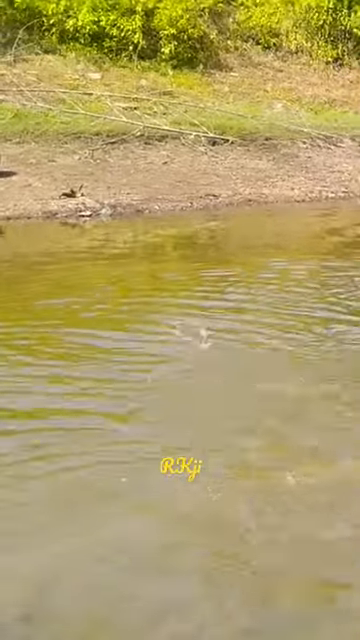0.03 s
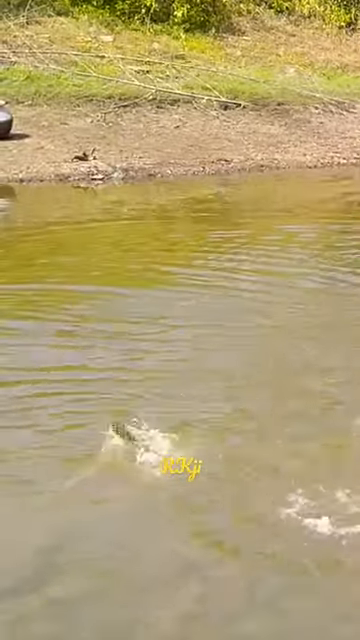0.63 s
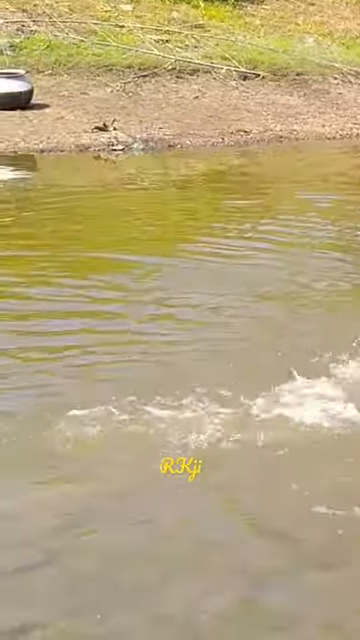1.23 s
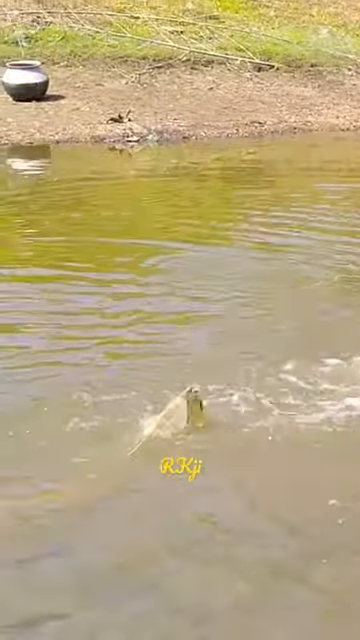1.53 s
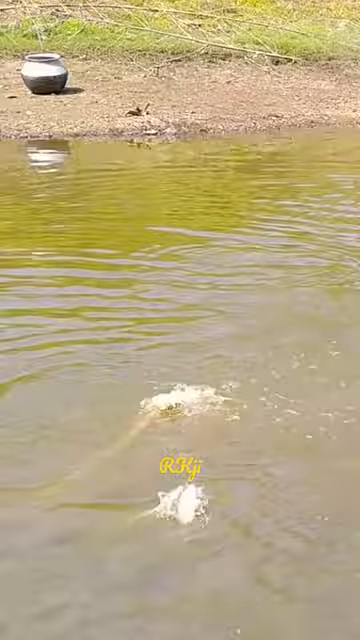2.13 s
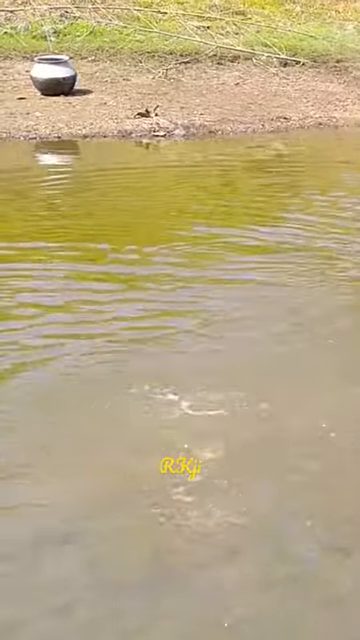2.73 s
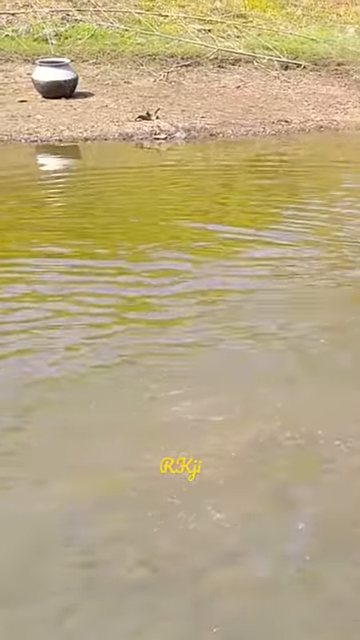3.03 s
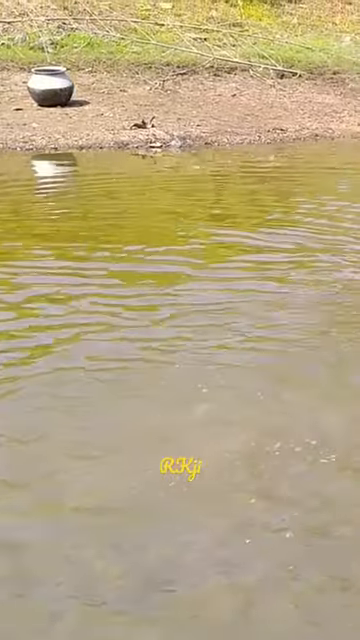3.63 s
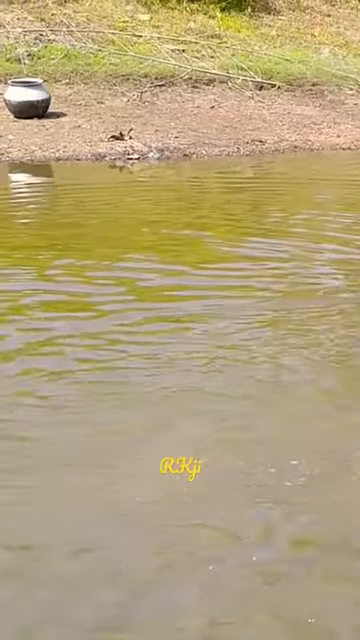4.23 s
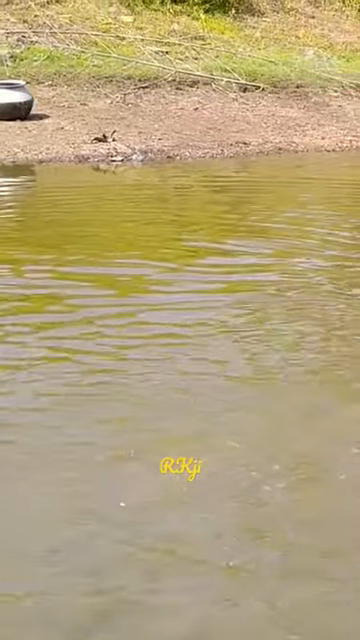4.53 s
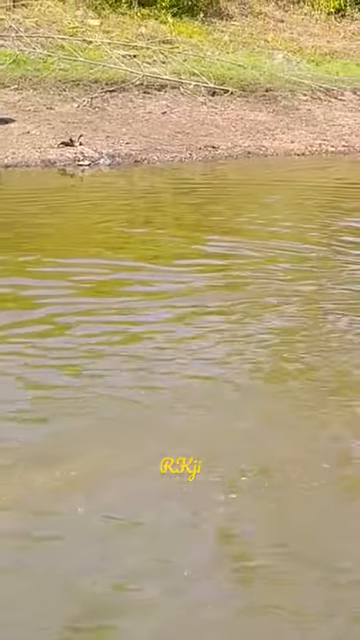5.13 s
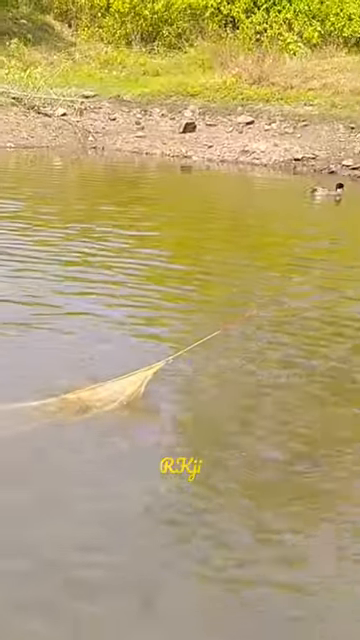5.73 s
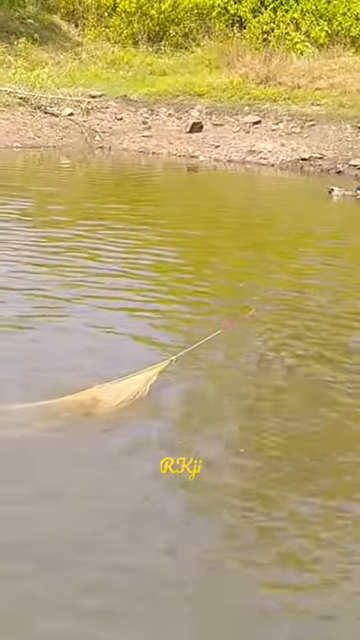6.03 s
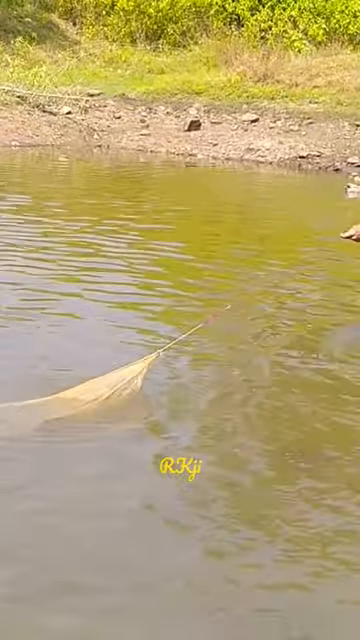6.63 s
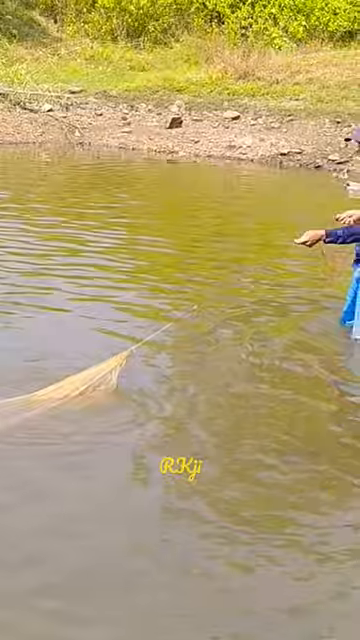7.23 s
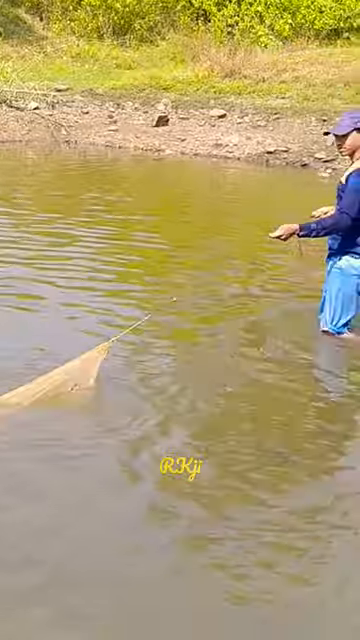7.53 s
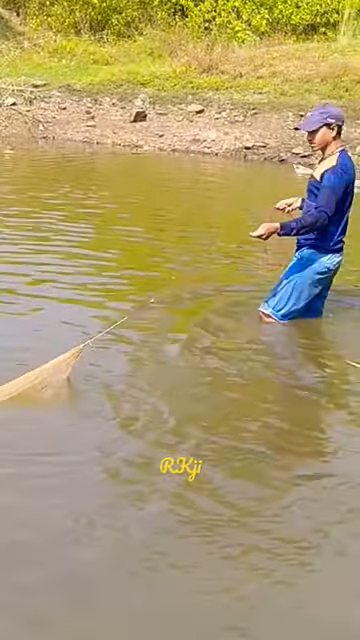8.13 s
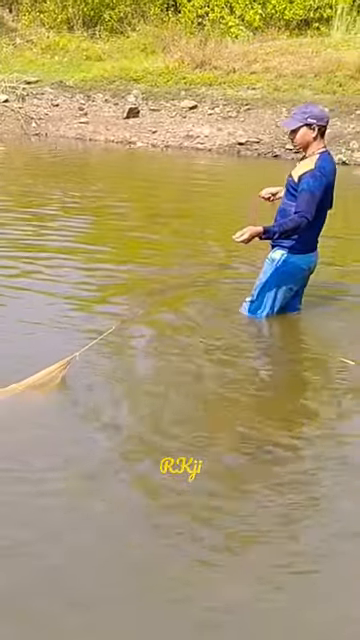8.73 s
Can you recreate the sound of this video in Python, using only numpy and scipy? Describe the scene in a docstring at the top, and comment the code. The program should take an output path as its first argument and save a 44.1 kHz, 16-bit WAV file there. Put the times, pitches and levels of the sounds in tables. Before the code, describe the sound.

Outdoors at a pond, water splashes, gurgles and plops as a net thrashes at the surface. The splashing soon dies away, and uneven low wind buffeting on the microphone takes over. Past the middle, faint trickles and drips fall from the net and the sound cuts out for an instant. Stronger gusts follow, along with brief dry scuffs, a very faint distant whistle and one tap on the microphone.

```python
"""A fishing net is jerked about in a pond: water slaps, air pockets plop, spray and foam crackle.
Each trapped bubble rings as a mass of water on a spring of air. After 2.5 s the pond settles to a few
drips, while gusts shed eddies that buffet the microphone over a faint open-air hiss. From 5 s the net is
hauled in slowly and trickles, and the sound drops out for an instant. Short scuffs follow close by;
near the end come a thin, distant whistle and a tap that rings the microphone housing."""
import sys
import numpy as np
from scipy import signal
from scipy.fft import rfft, irfft, next_fast_len
from scipy.io import wavfile
from scipy.ndimage import uniform_filter1d

SR = 44100
rng = np.random.default_rng(int(sys.argv[2]) if len(sys.argv) > 2 else 0)


def master_out(mix):
    """Clip the mix to full scale and print it as 16-bit PCM to the path in sys.argv[1]."""
    frames = np.transpose(np.atleast_2d(mix))
    ceiling = np.clip(frames, -1, 1)
    pcm = np.round(ceiling * 32767).astype(np.int16)
    wavfile.write(sys.argv[1], SR, pcm)


N = 392049

# Spectrum of bursting droplets: (frequency [Hz], relative spectral density [dB])
SPRAY = [(700, -14.5), (1500, 6), (2400, -1.5), (3500, 4), (4200, -2), (5000, -1.5), (6200, -5), (8500, -4),
         (11000, -12.5), (13500, -8), (15200, -13.5)]


def plops(sag=0.096, sag_cycles=1.22, swell_cycles=1.15, ring_cycles=2.3, wash_db=-16, wash_s=0.022):
    """Minnaert resonance: an air pocket rings, sinking in pitch, and leaves a wash of small bubbles."""
    # The largest pockets closing under the net: (time [s], level [dB], mid-glide frequency [Hz])
    pockets = [(.179, -25, 1560), (.286, -22, 1900), (0.368, -26.5, 560), (.474, -31.5, 720),
               (.498, -28, 1000), (.579, -31, 326), (.587, -30.5, 1080), (0.754, -21.5, 1130),
               (0.777, -21.5, 1090), (.792, -15, 893), (.856, -25, 880), (.87, -20, 864), (.974, -29, 1010),
               (.987, -25, 790), (1.109, -20, 1070), (1.149, -18, 925), (1.16, -20.5, 745),
               (1.192, -23.5, 840), (1.218, -21, 1090), (1.259, -23, 670), (1.3, -29, 990),
               (1.388, -25, 970), (1.401, -22.5, 803), (1.679, -26.5, 1160), (1.814, -33, 1180),
               (1.859, -34, 865), (2.13, -31.5, 800), (2.183, -30, 1490), (2.225, -24, 925),
               (2.235, -33, 387), (2.285, -29.5, 800), (2.444, -26.5, 1600), (2.498, -25, 1410),
               (2.509, -30, 665), (2.521, -27, 284)]
    out, t = np.zeros(N), np.arange(SR // 12) / SR
    for s, db, hz in pockets:
        cycles = hz * t
        swell = (1 - np.exp(-(cycles / swell_cycles) ** 2)) * np.exp(-cycles / ring_cycles)
        pitch = hz * (1 + sag * (2 * np.exp(-cycles / sag_cycles) - 1))
        tone = swell / swell.max() * np.sin(2 * np.pi * np.cumsum(pitch) / SR)
        band = signal.butter(2, [.75 * hz, 1.25 * hz], "band", fs=SR, output="sos")
        wash = rms_one(signal.sosfilt(band, rng.standard_normal(len(t))))
        add(out, s, from_db(db) * (tone + wash * from_db(wash_db) * np.exp(-t / wash_s)))
    return out


def churn(attack_s=0.024, gurgle_db=-7.0, slosh_db=-10.5, fizz_db=-5.5, foam_hz=3300, foam_cycles=8.1):
    """Air entrainment: each jerk stirs up bubbles, slosh and spray; the water goes on fizzing after."""
    # Jerks of the net: (start [s], hold [s], water level [dB], spray level [dB])
    jerks = [(0.283, 0.033, -38.5, -54), (0.364, 0.044, -33.5, -53), (0.458, 0.15, -38.5, -65),
             (0.724, 0.024, -43, -47.5), (0.77, .045, -34, -63), (.855, 0.064, -30.5, -55),
             (0.965, 0.052, -30.5, -54), (1.02, 0.051, -36, -47.5), (1.08, 0.26, -33.5, -55),
             (1.385, 0.024, -35, -49.5), (1.665, 0.025, -37, -60), (1.789, 0.06, -33, -62),
             (2.10, 0.041, -42, -60.5), (2.214, 0.021, -29.5, -50.5), (2.289, 0.011, -37.5, -64),
             (2.402, 0.023, -43, -44.5), (2.501, 0.018, -33.5, -69)]
    # Spectrum of the entrained bubbles: (frequency [Hz], relative level [dB])
    spectrum = [(220, -5), (370, -3.5), (520, -18.5), (680, -2.5), (850, 0), (1100, -3.5), (1600, -6.5),
                (2300, -16.5), (3000, -21.5)]
    stirred = swells([(0.0, 1.56, -54.5)], attack_s, release_s=0.97)   # lapping that slowly settles
    surge = swells([(s, hold, db) for s, hold, db, _ in jerks], attack_s, release_s=.02)
    surge *= from_db(4.0 * drift(22))
    mist = swells([(s, hold, db) for s, hold, _, db in jerks], attack_s, release_s=0.047)
    gurgle = bubbles(spectrum, per_s=450, cycles=3.5, spread_db=11, rise=.01)
    slosh_spectrum = [(100, -50)] + spectrum + [(6000, -60)]
    slosh = evened(coloured(grains(per_s=2100, spread_db=6.5), slosh_spectrum), size=1500)
    spray = evened(coloured(grains(per_s=2000, spread_db=6.0), SPRAY), size=2000)
    foam = evened(ring(grains(per_s=580, spread_db=2.0), foam_hz, foam_cycles / foam_hz), size=2500)
    foam *= swells([(1.07, 0.73, -57)], attack_s=0.13, release_s=0.13)   # left by the biggest splash
    low_cut = signal.butter(2, 240, "high", fs=SR, output="sos")
    water = signal.sosfilt(low_cut, from_db(gurgle_db) * gurgle + from_db(slosh_db) * slosh)
    return np.hypot(surge, stirred) * water + np.hypot(mist, from_db(fizz_db) * stirred) * spray + foam


def slaps(attack_s=.0008, splat_db=-1.5, overtone_db=-8.0, overtone=1.554, ring_cycles=26.0):
    """Impact excitation: a burst of cracking droplets drives two brief resonances of trapped air."""
    # Sheets of water slapping down: (time [s], level [dB], decay time [s], resonance [Hz])
    sheets = [(.2705, -30, 0.0042, 3050), (.287, -37, 0.0044, 4900), (.363, -39, 0.0091, 3020),
              (.391, -43, 0.0038, 5100), (.711, -40.5, 0.0096, 4000), (1.0195, -24.5, 0.0033, 3260),
              (1.031, -29.5, 0.0063, 3700), (1.051, -43, 0.024, 3670), (1.371, -43, 0.0044, 3720),
              (1.671, -33, 0.0058, 3720), (1.805, -46.5, 0.011, 3550), (1.918, -40.5, 0.0056, 3540),
              (2.200, -45.5, 0.017, 5540), (2.286, -37, 0.0032, 2920), (2.344, -34.5, 0.0044, 2300),
              (2.394, -33.5, 0.0042, 5660), (2.421, -36, 0.0067, 6000), (2.443, -43, 0.0035, 4830),
              (2.495, -47, 0.011, 5930)]
    out, t = np.zeros(N), np.arange(SR // 8) / SR
    droplets = evened(coloured(grains(per_s=4500, spread_db=2.0), SPRAY), size=300)
    for k, (s, db, decay_s, hz) in enumerate(sheets):
        burst = droplets[k * len(t):(k + 1) * len(t)]
        low, high = (evened(ring(burst, f, ring_cycles / f), size=250) for f in (hz, overtone * hz))
        splash = burst + from_db(splat_db) * (low + from_db(overtone_db) * high)
        envelope = (1 - np.exp(-t / attack_s)) * np.exp(-t / decay_s)
        add(out, s, from_db(db) * envelope * splash)
    return out


def drips(gain_db=-1.5, first_octave_s=.065):
    """Falling mass loading: a lone bubble wobbles and rises in pitch as it nears the surface."""
    # Single drips and bubbles: (time [s], level [dB], starting frequency [Hz], time scale [s])
    lone_bubbles = [(2.346, -23.5, 2210, 0.0042), (3.061, -45, 6840, .0056), (3.602, -53, 4970, 0.015),
                    (3.778, -46, 813, 0.036), (4.504, -38, 1970, 0.0085), (5.06, -44, 2250, .01),
                    (5.101, -40, 1110, 0.01), (5.183, -47, 564, 0.089), (5.596, -42, 1860, 0.011),
                    (5.62, -38.5, 1825, 0.026), (5.69, -51, 2910, .015), (5.836, -50, 2860, 0.025),
                    (6.41, -37, 2430, 0.018), (6.413, -37.5, 3070, .012), (6.617, -33, 1160, 0.0059),
                    (7.921, -49, 6660, 0.0045)]
    out = np.zeros(N)
    wobble = 1 + .05 * drift(250)
    for s, db, hz, scale_s in lone_bubbles:
        t = np.arange(int(2 * scale_s * SR)) / SR
        swell = (1 - np.exp(-t / scale_s / 0.19)) * np.exp(-2 * (t / scale_s) ** 2)
        pitch = hz * 2 ** ((t / first_octave_s) ** 2) * wobble[int(s * SR):][:len(t)]
        add(out, s, from_db(db + gain_db) * swell * np.sin(2 * np.pi * np.cumsum(pitch) / SR))
    return out


def trickle():
    """Drop impact: water falling from the mesh into the pond traps small ringing bubbles."""
    # Short runs draining from the hauled net: (start [s], hold [s], level [dB])
    runs = [(5.06, .15, -59), (5.58, 0.11, -57), (5.75, 0.18, -61.5), (6.40, 0.072, -57),
            (6.62, 0.12, -51.5), (6.82, .25, -61.5)]
    # Spectrum of the drops' bubbles: (frequency [Hz], relative level [dB])
    spectrum = [(500, -19), (900, -5), (1400, -8.5), (1900, -7), (2400, -16.5), (3100, -6), (4000, -19.5),
                (7000, -19.5), (11000, -23)]
    drops = bubbles(spectrum, per_s=700, cycles=4.5, spread_db=11, rise=.004)
    return swells(runs, attack_s=0.021, release_s=0.06) * drops


def bubbles(spectrum, per_s, cycles, spread_db, rise):
    """Superposed damped oscillators: random bubbles swell, ring and glide upward; rms about 1."""
    out, age = np.zeros(N), np.arange(SR // 25) / SR
    low, high = spectrum[0][0], spectrum[-1][0]
    for when, pitch, size, turn in rng.random((int(per_s * N / SR), 4)):
        hz = low * (high / low) ** pitch
        periods = hz * age[:int(4 * cycles / hz * SR)]
        gain = np.sqrt(hz) * from_db(at_hz(spectrum, hz) + spread_db * size ** 2)
        swell = (1 - np.exp(-periods ** 2)) * np.exp(-periods / cycles)
        phase = 2 * np.pi * (periods + rise * periods ** 2 / cycles + turn)
        add(out, when * N / SR, gain * swell * np.sin(phase))
    return evened(out, size=2600)


def wind(rumble_db=-3.0, buffet_db=-1.0, turbulence_db=-15.5, strong_db=-20, growth=1.45, low_cut_hz=66):
    """Turbulent pressure: gusts shed eddies on a low rumble; strong flow breaks into brighter noise."""
    # Gusts on the microphone: (start [s], hold [s], level [dB], extra turbulence [dB])
    gusts = [(0.258, 0.16, -42.5, -14), (0.472, 0.088, -46.5, 4), (0.943, 1, -43.5, 5),
             (1.634, 0.065, -22.5, 1.5), (1.774, 0.27, -31, -5), (2.337, .05, -44, -4),
             (2.648, 0.11, -35.5, 5), (2.808, 0.2, -26, 3), (3.349, 0.18, -28, -2),
             (3.575, 0.2, -34.5, -12), (4.049, 0.207, -34, 3), (4.486, 0.19, -38.5, 1.5),
             (4.758, 0.34, -27.5, 2), (5.12, 0.25, -39, -1.5), (5.502, .37, -36.5, -0.5),
             (6.009, 0.29, -31, 3.5), (6.391, 0.38, -17.5, 1.5), (6.825, 0.2, -21.5, 6.5),
             (7.054, 0.31, -27, 4.5), (7.463, 0.17, -24.5, 2), (7.711, .48, -35.5, 3),
             (7.992, 0.015, -12.5, -5), (8.30, .14, -37, 5), (8.536, 0.085, -24, 2.5),
             (8.732, 0.27, -34.5, 4.5)]
    # The strongest eddies: (time [s], level [dB], frequency [Hz], width [s])
    buffets = [(.293, -22, 120, 0.014), (1.073, -14, 138, 0.008), (1.447, -19, 131, .004),
               (1.638, -4, 154.4, 0.0068), (1.676, -7.5, 134, 0.0034), (1.795, -15, 150.5, 0.013),
               (1.902, -15.5, 128.3, 0.011), (2.818, -6, 117, 0.015), (2.923, -4, 190.7, 0.0072),
               (2.95, -8, 197, 0.0032), (3.008, -4, 130, 0.0057), (3.382, -11.5, 138.2, 0.0025),
               (3.471, -9.5, 209.6, 0.0067), (3.514, -12, 150, 0.0084), (4.191, -11, 125.2, 0.0065),
               (4.592, -16.5, 165.6, 0.0064), (4.941, -7, 180, .0034), (5.053, -11, 149.8, 0.0055),
               (5.662, -11, 144.6, 0.0053), (5.692, -14, 125.6, 0.026), (6.16, -11, 155.2, 0.0029),
               (6.236, -6.5, 148.5, 0.0054), (6.39, -4.5, 150.9, 0.012), (6.466, -7, 170.6, .0045),
               (6.525, -3.5, 130.4, 0.0084), (6.609, -5, 206.4, 0.0071), (6.677, -2.5, 205, 0.0042),
               (6.701, -4, 238.3, 0.005), (6.715, 0.5, 213, 0.0069), (7.11, -5, 172.5, .0048),
               (7.256, -2.5, 185.5, 0.0035), (7.272, -3.5, 192, 0.0031), (7.326, -1.5, 199.3, 0.0025),
               (7.51, -3, 172.2, 0.0036), (7.986, -9.5, 219.6, 0.0038), (8.012, -9, 154.5, 0.02),
               (8.309, -8, 133.7, .009), (8.37, -13, 160, 0.012), (8.593, -2, 166.7, 0.0072)]
    # Spectra of the rumble and of strong turbulence: (frequency [Hz], relative spectral density [dB])
    rumble_spectrum = [(25, -25.5), (45, -19), (62, -50), (85, 5), (115, 11.5), (170, -2), (250, -4.5),
                       (350, -21.5), (480, -54), (700, -57), (1200, -86)]
    turbulence_spectrum = [(120, -18.5), (220, 10), (330, 6.5), (480, -10.5), (700, -22.5), (1200, -36.5),
                           (2500, -42.5), (4500, -68.5)]
    attack_s, release_s = 0.031, 0.02
    breeze = from_db(-53.5 + 3.0 * drift(2.7))   # the light air between gusts
    flow = np.hypot(swells([(s, hold, db) for s, hold, db, _ in gusts], attack_s, release_s), breeze)
    swirl = swells([(s, hold, db + extra) for s, hold, db, extra in gusts], attack_s, release_s)
    lumps = from_db(5.0 * np.tanh(drift(30.5)))
    low = evened(coloured(rng.standard_normal(N), rumble_spectrum), size=900)
    high = evened(coloured(rng.standard_normal(N), turbulence_spectrum), size=400)
    large, large_swell = thumps(buffets)
    flow = flow * flow / np.hypot(flow, large_swell)   # a large eddy sweeps the small ones aside
    small, small_swell = thumps(small_eddies(flow))
    strength = np.sqrt((swirl * lumps) ** 2 + (.38 * large_swell) ** 2 + (0.2 * small_swell) ** 2)
    turbulence = from_db(strong_db + turbulence_db) * (strength / from_db(strong_db)) ** growth * high
    rumble = from_db(rumble_db) * flow * lumps * low
    pressure = from_db(buffet_db) * large + small + rumble + turbulence
    low_cut = signal.butter(5, low_cut_hz, "high", fs=SR, output="sos")
    return signal.sosfilt(low_cut, saturated(pressure))


def small_eddies(flow, per_s=21, hz=141.67, width_s=0.0083, over_db=10.0, spread_db=4.0, octaves=0.1945):
    """Vortex shedding: eddies leave at uneven intervals, as strong as the flow; rows for thumps()."""
    rows = []
    draws = rng.uniform(-1.001, 1, (int(per_s * N / SR) - 2, 4))
    for k, (late, size, pitch, width) in enumerate(draws):
        s = (k + 2 + late / 2) / per_s
        db = 20 * np.log10(flow[min(int(s * SR), N - 1)]) + over_db + spread_db * size
        rows.append((s, db, hz * 2 ** (octaves * pitch), width_s * 2 ** (width / 2)))
    return rows


def thumps(eddies, slowing=0.2304):
    """Convected eddies: each swings the pressure, fast as it arrives and slower as it leaves."""
    sound, envelope = np.zeros(N), np.zeros(N)
    t = np.arange(-SR // 20, SR // 20) / SR
    for (s, db, hz, width_s), turn in zip(eddies, rng.random(len(eddies))):
        swell = from_db(db) / np.cosh(2.78 * t / width_s)
        cycles = np.cumsum(hz * (1 - slowing * np.tanh(t / width_s))) / SR + turn
        add(sound, s + t[0], swell * np.sin(2 * np.pi * cycles))
        add(envelope, s + t[0], swell)
    return sound, envelope


def saturated(x, ceiling=.72):
    """Soft saturation: the microphone rounds off the strongest pressure swings."""
    return x / (1 + (x / ceiling) ** 4) ** .25


def scuffs():
    """Friction noise: a short, dry rub is a dense train of tiny slips."""
    # Rubs near the microphone: (start [s], level [dB], hold [s])
    rubs = [(6.652, -48.5, .004), (6.724, -41, 0.014), (7.046, -52, 0.019), (7.368, -44.5, 0.023),
            (7.746, -46, 0.019), (8.153, -33.5, 0.018), (8.606, -39, 0.0064)]
    # Spectrum of the rubbing: (frequency [Hz], relative spectral density [dB])
    spectrum = [(400, -14), (1000, -7), (1700, 0), (2500, 0), (3300, -13), (4500, -22), (6500, -22),
                (8500, -20), (11000, -25), (15200, -23)]
    pressure = swells([(s, hold, db) for s, db, hold in rubs], attack_s=.0035, release_s=.007)
    return pressure * evened(coloured(grains(per_s=4000, spread_db=3.0), spectrum), size=450)


def tap(time_s=8.6048, force_db=-14.5):
    """Modal ringing: one light impulse excites the quickly damped modes of the housing."""
    # Housing modes: (frequency [Hz], relative level [dB], time to fall by 60 dB [s])
    modes = [(1050, -5, .012), (1850, -3, .006), (2250, 0, .011), (2730, -3, .012), (3500, -17, .010),
             (8700, -27, .007), (10400, -25, .007)]
    click = np.zeros(N)
    add(click, time_s, from_db([force_db]))
    return sum((-1) ** k * from_db(db) * ring(click, hz, t60) for k, (hz, db, t60) in enumerate(modes))


def open_air(flicker_db=1.0):
    """Broadband noise: a faint hiss whose level drifts and flickers slightly."""
    # Course of the hiss: (time [s], level [dB])
    levels = [(0, -51.5), (2.7, -54.5), (3.6, -57.5), (4.8, -56), (5.4, -57.5), (5.55, -61.5), (6.1, -61),
              (6.7, -58.5), (7.3, -59), (8.0, -57.5), (8.89, -57.5)]
    # Spectrum of the hiss: (frequency [Hz], relative spectral density [dB])
    spectrum = [(100, 8.5), (400, 9), (800, 7), (1400, 6), (2100, 9), (2600, 5), (3400, 3), (4300, -3.5),
                (5100, -4), (6200, -6.5), (9200, -3.5), (10500, -11.5), (13500, -12), (15200, -3)]
    level_db = np.interp(np.arange(N) / SR, *np.transpose(levels))
    return from_db(level_db + flicker_db * drift(23)) * coloured(rng.standard_normal(N), spectrum)


def whistle(start_s=8.39, length_s=.13, hz=3620, arch_hz=130, waver=0.0086, peak_db=-63.5):
    """A modulated pure tone, probably a far bird: pitch and level arch together."""
    arch = np.sin(np.pi * np.clip((np.arange(N) / SR - start_s) / length_s, 0, 1))
    pitch = (hz + arch_hz * arch) * (1 + waver * drift(102))
    return from_db(peak_db) * arch * np.sin(2 * np.pi * np.cumsum(pitch) / SR)


def swells(rows, attack_s, release_s):
    """Incoherent addition: envelopes of events (start [s], hold [s], level [dB]) sum in power."""
    t, power = np.arange(0, N, 40) / SR, 0
    for start, hold, db in rows:
        outside = np.maximum(start - t, 0) / attack_s + np.maximum(t - start - hold, 0) / release_s
        power = power + (from_db(db) * np.exp(-np.minimum(outside, 20))) ** 2
    return np.interp(np.arange(N) / SR, t, np.sqrt(power))


def grains(per_s, spread_db):
    """Shot noise: random clicks, many small and a few large."""
    sizes = from_db(spread_db * np.minimum(rng.exponential(1, N), 4))
    return (rng.random(N) < per_s / SR) * sizes * rng.choice([-1, 1], N)


def ring(clicks, hz, t60):
    """Damped resonator: a unit click starts a decaying sine of height 1."""
    r, w = np.exp(-np.log(1000) / (t60 * SR)), 2 * np.pi * hz / SR
    return signal.lfilter([0, np.sin(w)], [1, -2 * r * np.cos(w), r * r], clicks + 1e-18)


def drift(hz, step=40):
    """Low-passed noise: a slow random fluctuation of rms 1."""
    r = np.exp(-2 * np.pi * hz * step / SR)
    slow = signal.lfilter([1], [1, -2 * r, r * r], rng.standard_normal(N // step + 2002))[2000:]
    return np.interp(np.arange(N) / step, np.arange(len(slow)), rms_one(slow))


def coloured(x, spectrum):
    """Linear filtering: give a steady signal a spectrum; rms 1."""
    size = next_fast_len(N)
    gain = from_db(at_hz(spectrum, np.fft.rfftfreq(size, 1 / SR)))
    return rms_one(irfft(rfft(x, size) * gain, size)[:N])


def at_hz(spectrum, hz):
    """Interpolate a spectrum on a log-frequency axis."""
    frequencies, levels = np.transpose(spectrum)
    return np.interp(np.log(hz + 1e-3), np.log(frequencies), levels)


def evened(x, size):
    """Hold the rms near 1 over stretches of size samples, keeping the finer grain."""
    return x / np.sqrt(np.abs(uniform_filter1d(uniform_filter1d(x * x, size), size)) + 1e-9)


def rms_one(x):
    """Scale to rms 1."""
    return x / np.sqrt(np.mean(x ** 2) + 1e-20)


def from_db(db):
    """Decibels to amplitude ratio."""
    return 10 ** (np.asarray(db) / 20)


def add(out, s, sound):
    """Superpose a short sound at time s."""
    start = max(int(s * SR), 0)
    out[start:start + len(sound)] += sound[:max(N - start, 0)]


def scene():
    """Superposition: water, wind, handling and background sum at one microphone."""
    water = plops() + churn() + slaps() + drips() + trickle()
    return (water + wind() + scuffs() + tap() + open_air() + whistle())[None]


def record(dry, port_hz=8550, port_width_hz=750, port_db=3.5, gap_s=(5.450, 5.492), cutoff_hz=15700):
    """Resonance of the microphone port lifts the treble; the sound drops out briefly; the top is cut."""
    b, a = signal.iirpeak(port_hz, port_hz / port_width_hz, fs=SR)
    heard = dry + from_db(port_db) * signal.lfilter(b, a, dry)
    t = np.arange(N) / SR
    gate = uniform_filter1d(1.0 * ((t < gap_s[0]) | (t > gap_s[1])), size=200)
    high_cut = signal.ellip(12, .2, 80, cutoff_hz, fs=SR, output="sos")
    return signal.sosfilt(high_cut, heard * gate)


dry = scene()
out = record(dry)
master_out(out)
```